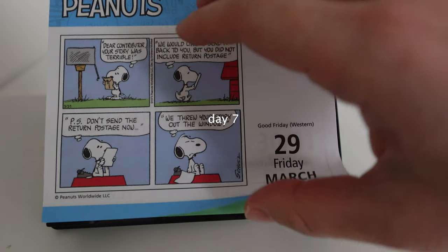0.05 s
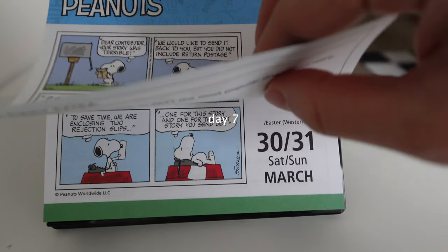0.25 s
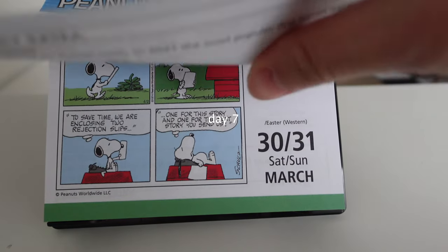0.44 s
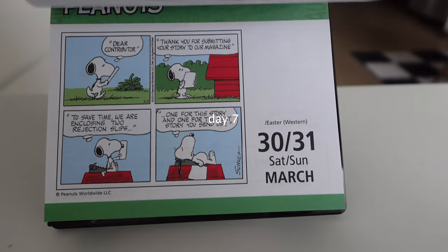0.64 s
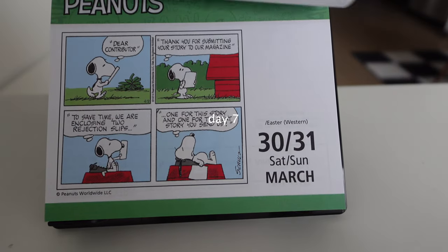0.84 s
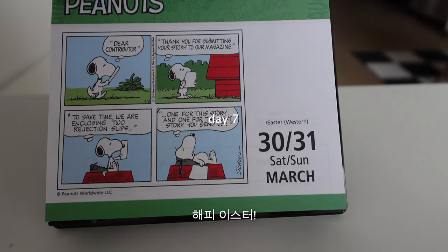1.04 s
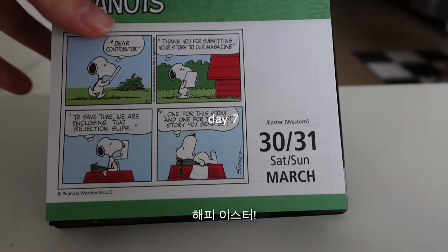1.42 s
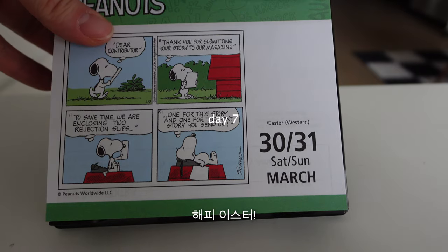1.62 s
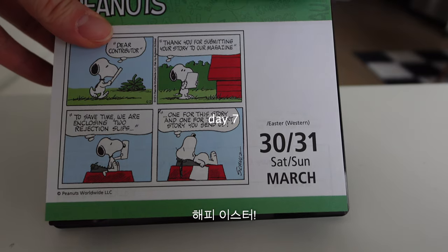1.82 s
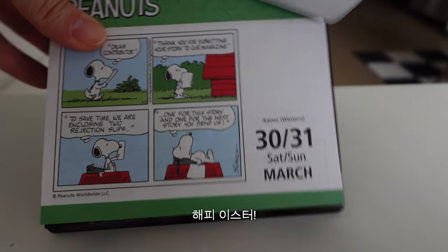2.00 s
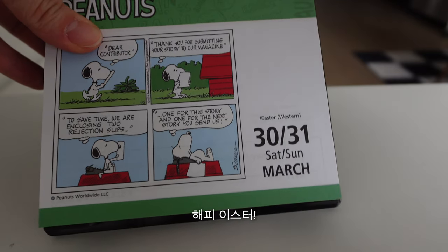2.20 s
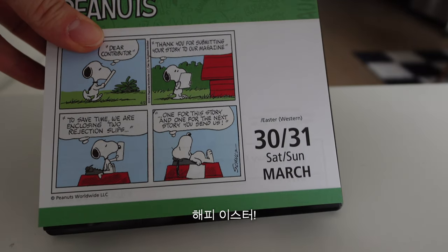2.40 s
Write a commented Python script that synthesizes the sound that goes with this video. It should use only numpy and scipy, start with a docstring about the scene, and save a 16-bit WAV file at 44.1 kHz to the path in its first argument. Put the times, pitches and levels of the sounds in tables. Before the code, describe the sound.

Paper rustles and tears close up in a bare, slightly echoing room. Fingers lift a calendar page, which swishes and pops as it bends over light knocks on a table, then gives in short rips and one longer tear.

```python
"""A bare room, where a page is torn from a desk calendar, close up.
A fingertip catches the corner; the sheet lifts and slides under the fingers, popping as it buckles,
while the pad bumps on the table. Fibres snap along the glued edge, which gives in a few short rips,
then in one long tear, and the room rings out over a faint hiss."""
import sys
import numpy as np
from scipy import signal
from scipy.fft import rfft, irfft, next_fast_len
from scipy.io import wavfile
from scipy.ndimage import uniform_filter1d, minimum_filter1d, map_coordinates

SR = 44100
rng = np.random.default_rng(int(sys.argv[2]) if len(sys.argv) > 2 else 0)


def put_to_file(sound):
    """Save the sound as 16-bit audio at rate SR, in the file named by the first command-line argument."""
    columns = np.atleast_2d(sound).T  # one column per channel
    safe = np.clip(columns, -1, 1)
    whole_steps = np.round(safe * 32767)
    wavfile.write(sys.argv[1], SR, whole_steps.astype(np.int16))


N = 112454
T = np.arange(N) / SR

# faint bed of hiss (frequency [Hz], gain [dB])
HISS_EQ = [(25, -21), (150, -9), (300, -1.5), (600, -8.5), (1500, -1), (4000, 1.5), (10000, 9),
           (15500, 1.5)]
# ring of the bare room (frequency [Hz], t60 [s])
ROOM_DECAY = [(150, 0.46), (500, 0.39), (1400, 0.66), (3700, 0.91), (7000, 0.79), (10000, 0.57),
              (15000, 0.37)]
# tone of the room's tail (frequency [Hz], gain [dB])
ROOM_EQ = [(40, -44), (150, -12), (400, 0), (660, -16.5), (820, 0.5), (1200, -1.5), (1600, 0), (2400, 0),
           (3500, -3), (6000, -2), (10000, -5.5), (15000, 1.5)]
# the pad hits the table (time [s], knock level [dB], t60 [s], thud relative to knock [dB])
PAD_BUMPS = [(.27, -47, 0.1, -23), (.565, -48, 0.18, -17), (.59, -43.5, 0.11, -14), (.635, -48.5, .12, -27),
             (.754, -37.5, 0.26, -14), (.788, -46.5, 0.12, 1.5), (0.968, -40, 0.12, -19),
             (1.0, -45.5, 0.13, -12), (1.112, -48, 0.27, -21), (1.155, -44, 0.16, -25),
             (1.239, -42.5, 0.24, -19), (1.288, -50, 0.064, -24), (1.376, -46, 0.25, -6.5),
             (1.504, -44, 0.087, -16), (1.585, -59, .15, -12), (1.661, -44, 0.1, -2.5),
             (1.683, -39, .12, -22), (1.745, -35, 0.14, -22), (1.778, -45, 0.1, -20),
             (1.812, -41, 0.059, -23), (1.87, -44, 0.17, -14), (1.97, -32, 0.42, -14.5),
             (2.04, -34.5, 0.16, -7), (2.13, -44, 0.16, -11), (2.212, -41.5, 0.1, -14)]
# the pad's hollow knock (frequency [Hz], gain [dB])
KNOCK_EQ = [(25, -42), (60, -31), (140, -13.5), (200, -1), (255, -0.5), (320, 3), (450, 5), (620, -18),
            (1200, -17), (3000, -53)]
# the deep thud under it (frequency [Hz], gain [dB])
THUD_EQ = [(25, -27), (60, -24), (105, 6.5), (160, 0.5), (400, -7), (1000, -85)]
# the fingertip catches the corner (time [s], level [dB], t60 [s])
CORNER_SCUFFS = [(.07, -43.5, 0.0083), (.105, -40, 0.046), (0.114, -36, 0.031), (.121, -40, 0.051),
                 (.131, -22, 0.0086), (0.1371, -28.5, 0.021), (0.147, -32, 0.03), (0.172, -34.5, 0.014)]
# tone of a scuff (frequency [Hz], gain [dB])
SCUFF_EQ = [(100, -62), (600, -42), (900, -8.5), (1400, -7), (2000, 3), (2600, -14), (3300, 7.5),
            (4600, 0.5), (6000, 1), (7500, -3), (10000, -7.5), (11200, -16), (15500, -36)]
# the sheet sweeps up (time [s], level [dB], pitch of the gap's resonances [ratio])
LIFT_CURVE = [(.17, -55.5, 0.85), (.205, -34.5, 0.84), (.235, -29, 0.89), (.275, -26.5, 0.79),
              (0.288, -27.5, 0.78), (0.359, -21, .95), (0.469, -21.5, 1.0), (.6, -23.5, 1.1),
              (.65, -26.5, 1)]
# resonances of the gap under the sheet at pitch ratio 1 (frequency [Hz], gain [dB])
GAP_EQ = [(1000, 0), (2300, -1), (3000, 3), (3700, 2), (5000, 2), (6400, 4), (7700, -7.5), (8700, -1),
          (11200, -4.5), (12200, -8.5), (16000, -10)]
# steady tone laid over that glide (frequency [Hz], gain [dB])
LIFT_EQ = [(40, -63), (200, -55), (560, -30), (830, -8), (1100, 0.5), (1500, -1), (2100, 4), (2700, 0),
           (15500, -1.5)]
# paper slides on paper and skin
# (start [s], length before the fall [s], rise [s], fall [s], level [dB], hiss centre [Hz], boost [dB])
SLIDE_STROKES = [(0.223, 0.049, 0.018, 0.012, -25, 12000, 6.5),
                 (.335, 0.028, 0.017, 0.036, -28.5, 4540, 22),
                 (0.503, 0.09, 0.036, 0.059, -22.5, 10700, 11),
                 (0.643, 0.097, 0.063, 0.034, -19, 5400, 1.5), (0.757, 0.064, 0.012, 0.05, -21, 3030, -0.5),
                 (0.856, 0.062, 0.018, 0.045, -21.5, 4740, 5.5),
                 (0.858, 0.098, 0.013, 0.043, -25.5, 2200, 2), (0.939, 0.066, 0.037, 0.032, -19.5, 8400, 5),
                 (1.077, 0.19, 0.027, .03, -20, 9300, 7), (1.115, 0.058, 0.016, 0.018, -21, 2180, 4.5),
                 (1.321, .022, 0.0095, 0.039, -19.5, 5350, 9),
                 (1.293, 0.075, 0.0079, 0.039, -20.5, 8100, 8.5),
                 (1.364, 0.04, 0.014, 0.0071, -17, 9600, 17), (1.424, 0.16, 0.0125, 0.046, -45, 2000, 12),
                 (1.503, 0.053, 0.0022, 0.016, -18, 8400, 10), (1.569, .11, 0.042, 0.091, -29, 8100, 0),
                 (2.436, 0.015, .006, 0.019, -42.5, 8800, 10), (2.516, .04, 0.032, .02, -46, 4000, 1)]
# tone shared by all strokes (frequency [Hz], gain [dB])
SLIDE_EQ = [(40, -74), (200, -25.5), (700, -23.5), (1000, -15), (1400, -1.5), (2300, -0.5), (3400, -1),
            (5000, -0.5), (6200, -3), (10000, -1), (12500, -8), (15500, -9)]
# the sheet buckles (time [s], peak [dB], resonance [Hz], width [Hz], t60 [s], flutter [ratio])
BUCKLE_POPS = [(0.561, -23, 1515, 1300, 0.0091, 0.099), (.592, -15.5, 1500, 900, 0.033, .15),
               (0.6346, -9.5, 1270, 197, 0.044, 0.027), (0.754, -4, 1728, 1022, 0.095, 0.14),
               (0.754, -4.5, 3000, 704, 0.037, 0.071), (1.002, -19, 2000, 1300, 0.02, 0.42),
               (1.171, -8.5, 2100, 1200, 0.041, 0.28), (1.66, -17, 1500, 1200, .02, .15),
               (1.6817, -6.5, 1570, 1000, 0.058, 0.19), (1.684, -4.5, 2900, 1950, 0.021, .4),
               (1.743, -14.5, 1300, 1000, 0.041, 0.11), (1.815, -12.5, 1430, 1230, 0.019, 0.27),
               (2.041, -9.5, 1190, 1100, 0.088, .3), (2.213, -11, 970, 300, 0.095, 0.24),
               (2.215, 0, 3670, 2530, 0.033, 0.2), (2.5255, -29, 2400, 500, .01, .05)]
# single sharp crackles (time [s], peak [dB])
CRACKLE_HITS = [(0.559, -33), (1.738, -21), (1.753, -20), (1.777, -6), (1.801, -3), (2.011, -15),
                (2.029, -23), (2.059, -6), (2.094, -6), (2.182, -11), (2.207, -15), (2.526, -24.5)]
# bright bite of a crackle (frequency [Hz], gain [dB])
CRACKLE_EQ = [(30, -42), (100, -32), (600, -43), (1200, 9), (3000, 12.5), (6000, 12.5), (9500, 2),
              (15500, -33)]
# first short rips (start [s], length [s], level [dB])
SHORT_RIPS = [(1.768, 0.0062, -25), (1.785, 0.008, -21.5), (1.804, 0.0096, -22), (1.822, 0.046, -35.5),
              (1.859, 0.0071, -29), (1.865, 0.0042, -23), (1.876, 0.0027, -21), (1.884, 0.0061, -20.5)]
# the long tear (time [s], body level [dB], treble level [dB])
TEAR_CURVE = [(1.893, -28, -41), (1.901, -15.5, -23), (1.925, -17, -18), (1.965, -14.5, -19.5),
              (1.995, -19, -19), (2.015, -17.5, -18), (2.048, -17, -25), (2.062, -26, -26.5),
              (2.101, -20.5, -24), (2.112, -12.5, -18.5), (2.135, -18, -23.5), (2.173, -22.5, -19.5),
              (2.19, -30, -22.5), (2.204, -22, -24.5), (2.219, -16.5, -29), (2.233, -32, -32)]
# midrange rasp of the tear (frequency [Hz], gain [dB])
TEAR_BODY_EQ = [(30, -37), (120, -26.5), (330, -8), (550, -10.5), (1000, -3.5), (1600, -0.5), (2700, 1.5),
                (4200, 3.5), (5400, -2.5), (9000, -40), (15000, -33.5)]
# sizzle on top of it (frequency [Hz], gain [dB])
TEAR_TREBLE_EQ = [(500, -45), (3000, -2), (6800, 5.5), (9500, 3), (13000, -3.5), (15500, -10)]


def amp(db):
    """Decibels to gain."""
    return 10 ** (np.asarray(db) / 20)


def unit(x):
    """Scale to rms 1."""
    return x / np.sqrt(np.mean(x ** 2) + 1e-20)


def along(points, hz):
    """Read (frequency, value) points on a log frequency axis."""
    freqs, values = np.transpose(points)
    return np.interp(np.log(hz + 1), np.log(freqs + 1), values)


def wobble(knots_per_s):
    """A smooth random curve."""
    return map_coordinates(rng.standard_normal(int(N * knots_per_s / SR) + 4), [T * knots_per_s])


def fader(times, db):
    """A gain ride through level points, silent outside them."""
    return amp(np.interp(T, times, db, left=-120, right=-120))


def decay(start, t60):
    """An instant attack with an exponential tail."""
    return amp(-60 * np.maximum(T - start, 0) / t60) * (T >= start)


def filtered(x, response):
    """Filter by a complex function of frequency."""
    size = next_fast_len(len(x) + SR // 10)
    return irfft(rfft(x, size) * response(np.fft.rfftfreq(size, 1 / SR)), size)[:len(x)]


def eq(x, points, size=4096):
    """Minimum-phase EQ: nothing rings ahead of an attack."""
    cepstrum = irfft(np.log(amp(along(points, np.fft.rfftfreq(size, 1 / SR)))))
    cepstrum[1:size // 2] *= 2
    cepstrum[size // 2 + 1:] = 0
    return signal.fftconvolve(x, irfft(np.exp(rfft(cepstrum))))[:len(x)]


def add(track, start, sound):
    """Mix a sound in at a time in seconds."""
    part = track[round(start * SR):][:len(sound)]
    part += sound[:len(part)]


def excited(envelope, body_eq):
    """Noise bursts rung through a body's resonances; the envelope sets the rms."""
    white = rng.standard_normal(N)
    return eq(white * envelope, body_eq) / np.std(eq(white, body_eq))


def snap(t60, scatter):
    """One sharp release followed by a dying scatter of small ones."""
    t = T[:SR // 10]
    releases = scatter * rng.standard_normal(len(t)) * amp(-60 * t / t60)
    releases[0] = 1
    return releases


def friction(patchy_db=2.08, rough_db=1.15, waver_db=1.5):
    """Rough rubbing noise whose colour shifts in patches."""
    spectra = signal.stft(rng.standard_normal(N), nperseg=512)[2]
    patches = uniform_filter1d(rng.standard_normal(spectra.shape), size=6, axis=0)
    patches = unit(uniform_filter1d(patches, size=12, axis=1))
    rub = signal.istft(spectra * amp(patchy_db * patches), nperseg=512)[1][:N]
    return rub * amp(rough_db * wobble(900) + waver_db * wobble(69.5))


def background_hiss(level_db=-54):
    """A faint, steady hiss under everything."""
    return amp(level_db) * unit(eq(rng.standard_normal(N), HISS_EQ))


def room_reverb(x, predelay=SR // 200):
    """The room's diffuse tail, each frequency dying at its own speed."""
    hz, t, spectra = signal.stft(rng.standard_normal(SR), SR, nperseg=256)
    spectra *= amp(-60 * t / along(ROOM_DECAY, hz)[:, None])
    tail = eq(signal.istft(spectra, SR, nperseg=256)[1], ROOM_EQ)
    return signal.fftconvolve(x, np.pad(tail / np.linalg.norm(tail), (predelay, 0)))[:N]


def pad_bumps():
    """The hand jolts the pad, which knocks hollowly on the table."""
    knock = sum(amp(db) * decay(start, t60) for start, db, t60, _ in PAD_BUMPS)
    thud = sum(amp(db + thud_db) * decay(start, t60) for start, db, t60, thud_db in PAD_BUMPS)
    return excited(knock, KNOCK_EQ) + excited(thud, THUD_EQ)


def finger_scuffs():
    """The fingertip sticks and slips on the corner of the page."""
    slips = sum(amp(db) * decay(start, t60) for start, db, t60 in CORNER_SCUFFS)
    return excited(slips, SCUFF_EQ)


def sheet_lift():
    """The sheet sweeps up; the resonances of the gap beneath it glide higher."""
    times, db, pitch = np.transpose(LIFT_CURVE)
    gap = eq(friction(), GAP_EQ)
    position = np.cumsum(np.interp(T, times, pitch))  # varispeed bends the resonances
    glide = map_coordinates(gap, [position], mode="mirror")
    return unit(eq(glide, LIFT_EQ)) * fader(times, db)


def paper_slides(hiss_octaves=0.38):
    """Paper rubs on paper and skin; each stroke swells and fades with its own band of hiss."""
    out = np.zeros(N)
    for start, length, rise, fall, db, hz, boost_db in SLIDE_STROKES:
        bell_db = lambda f: boost_db * np.exp(-.5 * (np.log2((f + 1) / hz) / hiss_octaves) ** 2)
        rub = unit(filtered(friction(), lambda f: amp(along(SLIDE_EQ, f) + bell_db(f))))
        attack = np.sqrt(np.clip((T - start) / rise, 0, 1))
        release = np.clip(1 - (T - start - length) / fall, 0, 1)
        out += amp(db) * rub * attack * release
    return out


def buckle_pops(low_cut_hz=450):
    """The bent sheet flips over and rings briefly; being thin, it radiates little bass."""
    out = np.zeros(N)
    low_cut = lambda f: 1j * f / (1j * f + low_cut_hz)
    for start, db, hz, width, t60, flutter in BUCKLE_POPS:
        resonance = lambda f: 2j * f * width / (hz * hz - f * f + 2j * f * width)
        ring = filtered(snap(t60, flutter), lambda f: resonance(f) ** 2 * low_cut(f))
        add(out, start, amp(db) * ring / abs(ring).max())
    return out


def crackles():
    """Creases and stiff fibres let go one at a time."""
    out = np.zeros(N)
    for start, db in CRACKLE_HITS:
        click = eq(snap(t60=0.0077, scatter=0.22), CRACKLE_EQ)
        add(out, start, amp(db) * click / abs(click).max())
    return out


def page_tear(fibres_per_s=3500, spread_db=5.5, clump_db=2, fuzz=0.52):
    """Fibres break in clumps along the glued edge: short rips, then the long tear."""
    breaks = (rng.random(N) < fibres_per_s / SR) * rng.choice([-1, 1], N)
    strength = amp(spread_db * np.clip(rng.standard_normal(N), -2, 2))
    fibres = unit(breaks * strength) + fuzz * rng.standard_normal(N)
    fibres *= amp(clump_db * wobble(350))
    body, treble = unit(eq(fibres, TEAR_BODY_EQ)), unit(eq(fibres, TEAR_TREBLE_EQ))
    times, body_db, treble_db = np.transpose(TEAR_CURVE)
    out = body * fader(times, body_db) + treble * fader(times, treble_db)
    rip = unit(body + amp(-1) * treble)
    for start, length, db in SHORT_RIPS:
        gate = np.interp(T - start, [0, .003, length + 0.0026, length + 0.0074], [0, 1, 1, 0])
        out += amp(db) * rip * gate
    return out


def scene():
    """A centred mix: handling stays close, while pops and the tear carry further into the room."""
    handling = finger_scuffs() + sheet_lift() + paper_slides() + pad_bumps() + crackles()
    stems = [(handling, -18), (buckle_pops(), -13), (page_tear(), -7.5)]  # (sound, reverb send [dB])
    mono = sum(stem + amp(send_db) * room_reverb(stem) for stem, send_db in stems)
    mono += background_hiss()
    return np.array([mono, mono])


def record(dry, threshold=0.7, high_cut_hz=15900):
    """A fast limiter ducks the highest peaks, then a brick-wall filter trims the top end."""
    needed = np.minimum(1, threshold / (abs(dry).max(axis=0) + 1e-9))
    gain = uniform_filter1d(minimum_filter1d(needed, size=41), size=41)
    return np.array([filtered(channel, lambda hz: hz < high_cut_hz) for channel in dry * gain])


dry = scene()
out = record(dry)
put_to_file(out)
```